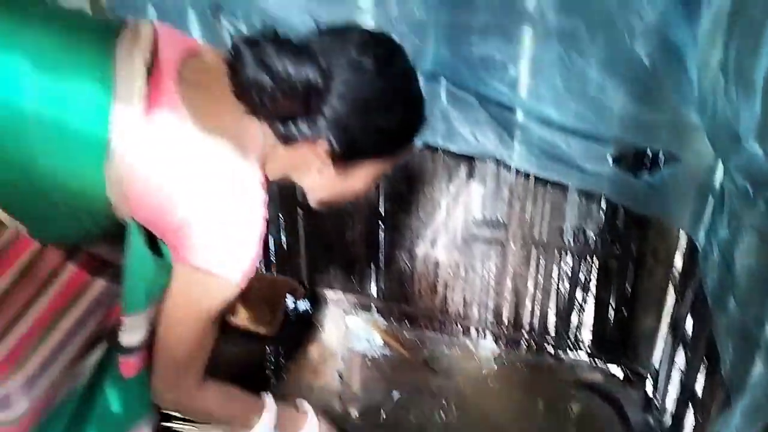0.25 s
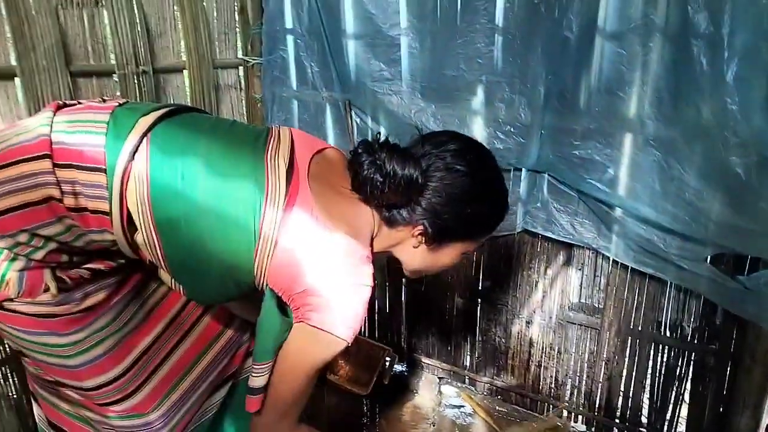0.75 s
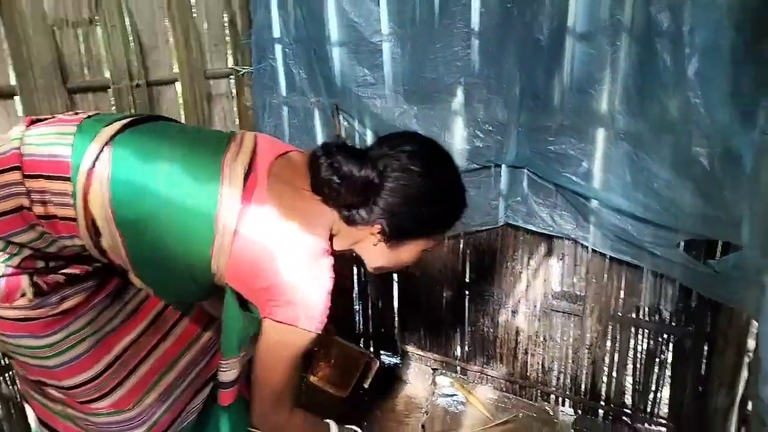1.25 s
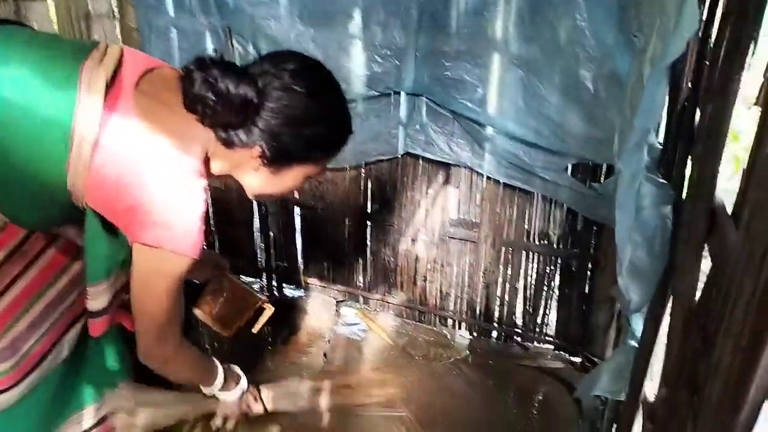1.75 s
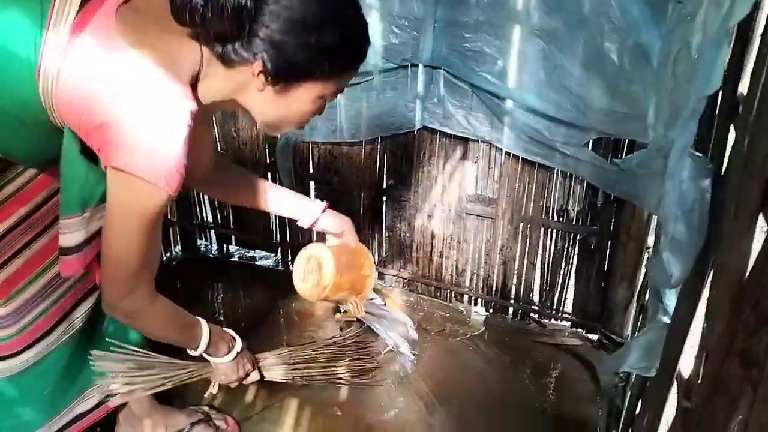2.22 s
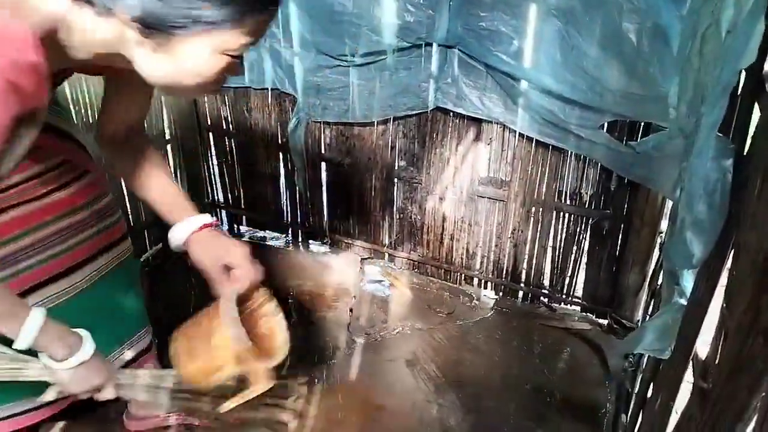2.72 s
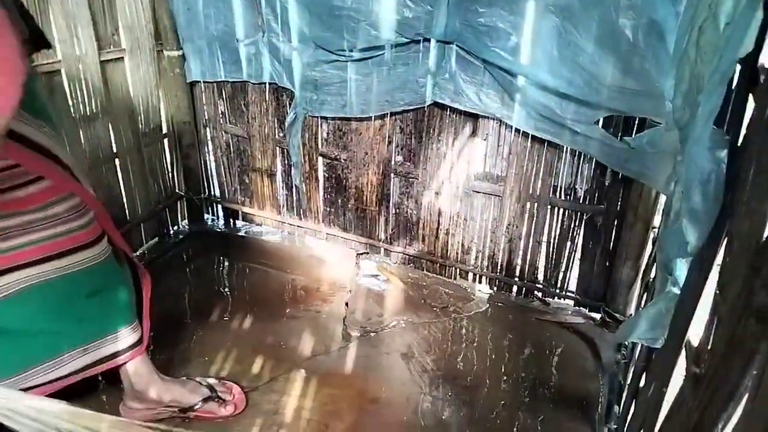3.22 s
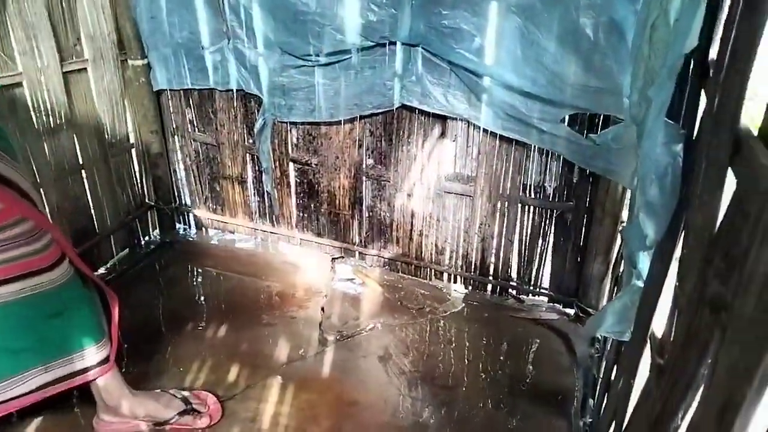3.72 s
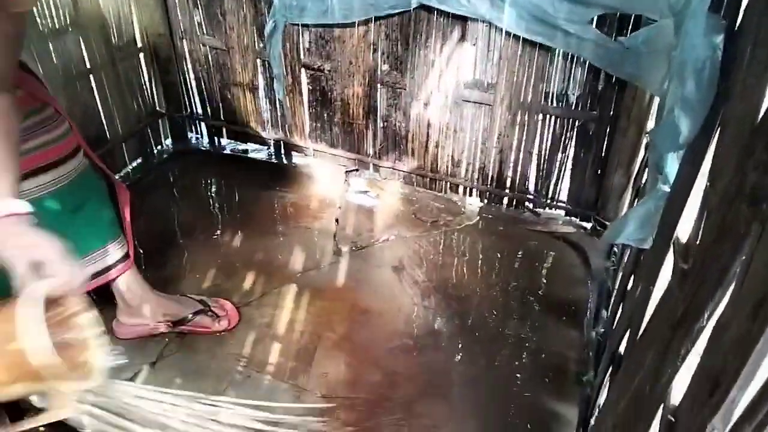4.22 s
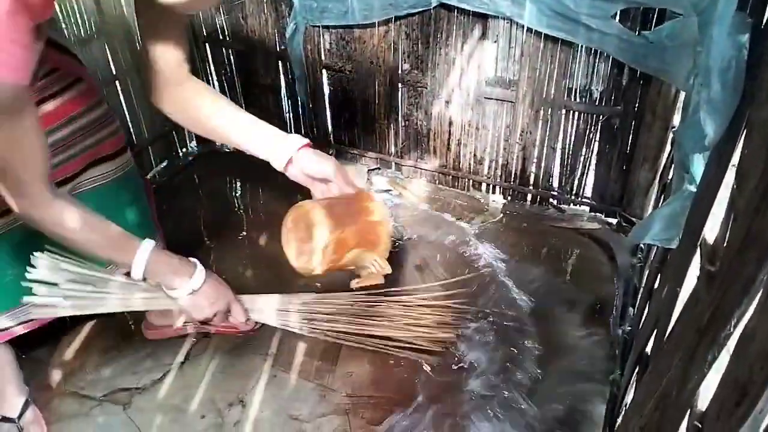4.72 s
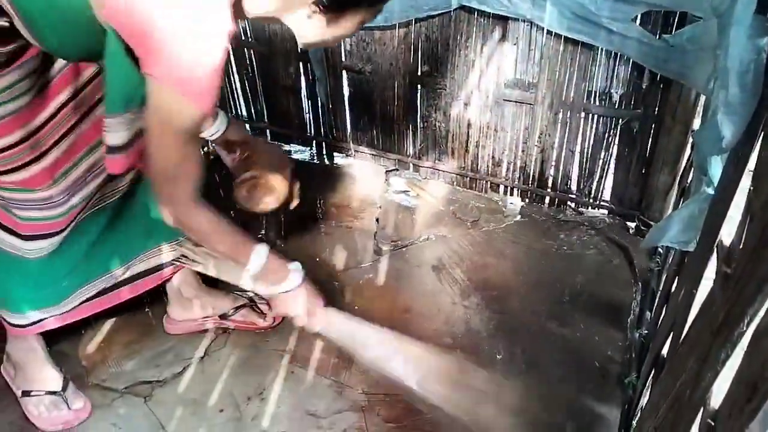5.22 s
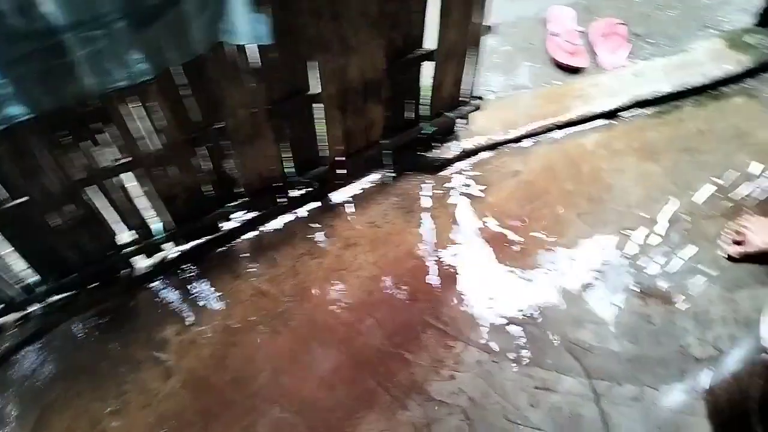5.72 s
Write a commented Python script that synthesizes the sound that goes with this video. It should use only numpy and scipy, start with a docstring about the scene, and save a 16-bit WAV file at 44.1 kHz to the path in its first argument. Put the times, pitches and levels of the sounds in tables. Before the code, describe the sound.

Quick dry-edged swishes of a bundle of sticks on wet floor come first, with snaps and slosh. After two seconds a hollow plastic knock and brief splash lead into a quieter gap with mostly motor hum. Then come a bubbling gulp, drips, clicks, a longer splash and renewed softer scrubbing. Close handheld microphone, short scatter from thin walls, slightly harsh treble.

```python
"""A small bamboo washroom, heard close up: a stiff stick broom scrubs the wet floor in quick strokes.
Its sticks are crowds of short rings under stroke-shaped gains; stirred and thrown water is crowds of
longer bubble rings. A plastic mug gulps air as sliding sines and knocks as a set of ringing modes.
Far off, a slow engine throbs as a sum of harmonics over a soft noise hiss."""
import sys
import numpy as np
from scipy import signal
from scipy.fft import rfft, irfft, next_fast_len
from scipy.io import wavfile

SR = 44100
rng = np.random.default_rng(int(sys.argv[2]) if len(sys.argv) > 2 else 0)


def wrap_up_sound(samples):
    """Save the sound to the file named by the first command line argument, as 16-bit audio."""
    columns = np.atleast_2d(samples).T
    # keep every value between -1 and 1, then stretch to whole-number steps
    tamed = np.clip(columns, -1, 1)
    steps = np.round(tamed * 32767).astype(np.int16)
    wavfile.write(sys.argv[1], SR, steps)


N = 263056
TIME = np.arange(N) / SR

# flicks, where the stick tips land or spring free: start_s, scrape_db (before the broom's trim),
# stirred_db (before the slosh trim)
FLICKS = [(0.074, -26.5, -49), (0.42, -69, -52), (0.47, -27.5, -39), (1.107, -21.5, -33),
          (1.338, -33.5, -37.5), (1.707, -24, -35.5), (1.912, -27.5, -32.5), (5.078, -45, -51),
          (5.27, -36.5, -37.5), (5.785, -39.5, -39)]


def from_db(db):
    """Decibels to gain."""
    return 10 ** (np.asarray(db) / 20)


def rms_one(x):
    """Scale to rms 1."""
    return x / np.sqrt(np.mean(x ** 2) + 1e-20)


def at_hz(points, hz):
    """Read a table on a log-frequency axis."""
    f, value = np.transpose(points)
    return np.interp(np.log(np.maximum(hz, 1)), np.log(f), value)


def at_time(points):
    """Read a table of (time_s, value) at every sample."""
    return np.interp(TIME, *np.transpose(points))


def drift(rate_hz):
    """Random values of spread 1, drawn rate_hz times a second and joined by straight lines."""
    return np.interp(TIME * rate_hz, np.arange(2000), rng.standard_normal(2000))


def decay(t, t60_s):
    """Gain that falls 60 dB in t60_s."""
    return np.exp(-np.log(1000) * t / t60_s)


def ring(x, hz, t60_s):
    """Two-pole resonator: a unit click sets a dying sine of starting height 1 ringing."""
    radius = decay(1 / SR, t60_s)
    w = 2 * np.pi * hz / SR
    # the tiny offset keeps the filter clear of slow, vanishing numbers
    return signal.lfilter([0, np.sin(w)], [1, -2 * radius * np.cos(w), radius ** 2], x + 1e-18)


def diffuse(pair, spectrum):
    """Two unrelated signals become a coloured stereo field, alike in the bass; rms 1."""
    # left-right correlation: pitch_hz, likeness (0 unrelated, 1 identical)
    likeness = [(30, 0.43), (350, 0.69), (700, 0.63), (1300, 0), (2000, 0.024), (15000, 0)]
    size = next_fast_len(N)
    hz = np.arange(size // 2 + 1) * SR / size
    mid, side = rfft(pair, size) * from_db(at_hz(spectrum, hz))
    alike = at_hz(likeness, hz)
    left_right = np.sqrt(1 + alike) * mid + np.sqrt(1 - alike) * side * [[1], [-1]]
    return rms_one(irfft(left_right, size)[:, :N])


def grains(per_s, low_hz, high_hz, cycles, spread_db, clump_db, count):
    """Random clicks ring a row of resonators, each busy in spells; two unrelated mixes, flat per Hz."""
    out = np.zeros((2, N))
    each = int(per_s / count * N / SR)
    for hz in np.geomspace(low_hz, high_hz, count):
        when, turn = rng.random((2, each))
        size = np.clip(rng.standard_normal(each), -2, 2)
        spell = np.interp(when, np.linspace(0, 1, 270), rng.standard_normal(270))
        # each grain reaches the ears by its own paths
        ears = np.array([np.cos(2 * np.pi * turn), np.sin(2 * np.pi * turn)])
        clicks = np.zeros((2, N))
        clicks[:, (when * N).astype(int)] = ears * from_db(spread_db * size + clump_db * spell)
        out += np.sqrt(hz) * rms_one(ring(clicks, hz, cycles / hz))
    return rms_one(out)


def add(out, start_s, sound):
    """Mix a short sound in at start_s."""
    at = max(round(start_s * SR), 0)
    out[..., at:at + sound.shape[-1]] += sound[..., :N - at]


def swell(start_s, hold_s, attack_s, release_s):
    """Gain that rises to 1 at start_s, holds and dies away; attack and release are times for 20 dB."""
    early = np.maximum(start_s - TIME, 0)
    late = np.maximum(TIME - start_s - hold_s, 0)
    return from_db(-np.minimum(20 * (early / attack_s + late / release_s), 200))


def room(x):
    """The direct sound and a short scatter from the slatted walls, different at each ear."""
    t60_s, scatter_db = 0.086, -3.5
    t = TIME[:SR // 3]
    tail = rng.standard_normal((2, len(t))) * decay(t, t60_s) * (t > .003)
    tail /= np.sqrt(np.sum(tail ** 2, axis=1, keepdims=True))
    # thin walls let the bass out
    tail = signal.sosfilt(signal.butter(1, 700, "high", fs=SR, output="sos"), tail)
    scatter = signal.fftconvolve(np.broadcast_to(x, (2, N)), tail, axes=1)[:, :N]
    return x + from_db(scatter_db) * scatter


def hiss():
    """Background hiss: coloured stereo noise at a slowly moving level."""
    # loudness: time_s, level_db
    loudness = [(0, -47.5), (1.5, -46), (4.4, -43.5), (5.75, -45)]
    # spectrum: pitch_hz, relative density_db (per Hz)
    spectrum = [(25, 7), (60, 18), (150, 16.5), (300, 11.5), (410, 5), (600, -2.5), (850, -1), (1200, 6),
                (1600, 1.5), (2200, 4.5), (4000, -4), (7000, -11), (9200, 1.5), (11000, -11.5),
                (14500, -17)]
    return from_db(at_time(loudness)) * diffuse(rng.standard_normal((2, N)), spectrum)


def engine(first_firing_s, knock_delay_s, knock_db, uneven_db):
    """Harmonics of the firing rate, phased as a firing that rings the exhaust, then a brighter knock."""
    # engine speed: time_s, firing_rate_hz
    firing_rate = [(0, 25.0), (1.6, 25.0), (1.8, 24.95), (6, 24.95)]
    # exhaust harmonics: multiple of the firing rate, relative level_db
    exhaust = [(1, -47), (2, -15), (3, -24.5), (4, -17.5), (5, -7.5), (6, 1.5), (7, -6.5), (8, -18.5),
               (9, -11), (10, -18.5), (11, -11), (12, -12), (13, -16), (14, -27), (15, -43.5), (16, -70.5)]
    # loudness: time_s, level_db (before the left-right balance)
    loudness = [(0, -34.5), (.8, -35.5), (2.3, -33.5), (4.4, -32.5), (5.8, -35)]
    speed = at_time(firing_rate)
    turns = np.cumsum(speed) / SR - first_firing_s * speed[0]
    orders, levels_db = np.transpose(exhaust)
    gains = from_db(levels_db)
    knock = from_db(knock_db) * (orders / 10) ** 2
    pair = 1 + knock * np.exp(-2j * np.pi * orders * speed[0] * knock_delay_s)
    pipe = np.log(gains / np.abs(pair))
    # minimum phase: a sudden puff, then a dying ring
    mirrored = np.r_[pipe[0], pipe, pipe[-2::-1]]
    lags = np.imag(signal.hilbert(mirrored))[1:len(orders) + 1] - np.angle(pair)
    throb = sum(g * np.cos(2 * np.pi * k * turns - lag) for k, g, lag in zip(orders, gains, lags))
    throb = rms_one(throb * from_db(uneven_db * drift(25))) * from_db(at_time(loudness))
    late = np.interp(TIME - .00033, TIME, throb)   # it comes from the left
    return np.array([throb * from_db(0.6), late * from_db(-0.4)])


def mug():
    """A soft contact rings the modes of the plastic mug, a little differently each time."""
    # dull knocks: start_s, level_db (gain on the modes), contact_hz (low-pass cut-off)
    knocks = [(1.018, -39, 900), (2.387, -19.5, 808), (4.25, -34, 1100), (4.31, -35, 1100),
              (5.725, -43, 700)]
    # mug modes: pitch_hz, mean level_db, t60_s
    mug_modes = [(410, -4.5, 0.024), (563, 3, 0.0083), (644, -1, 0.025), (880, -4.5, 0.024),
                 (1100, -7, 0.037), (1380, -20, .02)]
    out, t = np.zeros(N), TIME[:SR // 4]
    for start_s, level_db, contact_hz in knocks:
        modes = np.zeros(len(t))
        for k, (hz, db, t60_s) in enumerate(mug_modes):
            gain = from_db(db + rng.standard_normal()) * (-1) ** k
            modes += gain * ring(t == 0, hz, t60_s)
        soft = signal.butter(2, contact_hz, fs=SR, output="sos")
        add(out, start_s, from_db(level_db) * signal.sosfilt(soft, modes))
    return out


def bubbles(rows, glide, attack_s, ragged):
    """Each pocket of air rings as a dying sine whose pitch slides; moving water makes its level ragged."""
    out, t = np.zeros(N), TIME[:SR // 4]
    for start_s, level_db, hz, t60_s in rows:
        slide = 1 + glide * np.minimum(t / t60_s, 1)
        phase = 2 * np.pi * np.cumsum(hz * slide) / SR
        shake = rms_one(ring(rng.standard_normal(len(t)), hz, 24 / hz))
        tone = (np.sin(phase) + ragged * shake) / np.sqrt(1 + 2 * ragged ** 2)
        add(out, start_s, from_db(level_db) * tone * decay(t, t60_s) * (1 - np.exp(-t / attack_s)))
    return out


def gulps():
    """The mug gulps air as it goes under: bubbles that slide down in pitch."""
    # start_s, level_db (before onset and decay), first pitch_hz, t60_s
    rows = [(3.606, -6.5, 544, 0.033), (3.618, -8.5, 528, 0.05), (3.64, -29, 492, 0.11)]
    return bubbles(rows, glide=-.05, attack_s=0.0026, ragged=0.29)


def plops():
    """Single large bubbles and drops that slide up in pitch."""
    # start_s, level_db (before onset and decay), first pitch_hz, t60_s
    rows = [(0.967, -10, 1540, 0.01), (2.499, -19.5, 2030, 0.023), (2.675, -34, 760, 0.1),
            (3.502, -22.5, 410, 0.074), (3.524, -29, 2310, 0.045), (3.528, -30, 884, 0.063),
            (3.83, -31, 2260, 0.026), (3.99, -21.5, 2300, 0.031), (4.0, -34.5, 880, 0.14),
            (4.01, -24, 1062, 0.052), (4.543, -29, 3260, 0.032), (4.884, -19.5, 2377, 0.07),
            (5.245, -33, 489, 0.096), (5.755, -36, 653, 0.11), (5.76, -27, 1030, 0.055),
            (5.862, -30.5, 1928, 0.11)]
    return bubbles(rows, glide=0.12, attack_s=0.00078, ragged=0.44)


def gurgles(scatter, cycles, count):
    """A crowd of bubbles whose common pitch glides as broom or mug pushes the film of water along."""
    # start_s, length_s, level_db (rms over the length), first_hz, last_hz
    rows = [(0.015, 0.033, -35, 1790, 1750), (0.0, 0.11, -31, 2780, 3690),
            (0.105, 0.095, -37.5, 3660, 2660), (1.014, 0.082, -40, 1900, 2040),
            (1.031, 0.074, -45, 2770, 2830), (3.561, 0.05, -42, 1900, 1590), (3.985, 0.11, -45, 2520, 2010),
            (4.669, 0.053, -39.5, 1420, 1154), (4.736, .08, -35, 3360, 2820),
            (4.775, 0.075, -35.5, 1840, 1254), (5.41, .15, -33.5, 3640, 3180),
            (5.682, .11, -38, 1830, 1117), (5.774, .06, -37.5, 1470, 1710)]
    out = np.zeros((2, N))
    for start_s, length_s, level_db, first_hz, last_hz in rows:
        share = (np.arange(count) + rng.random(count)) / count
        chance = rng.standard_normal((3, count))
        hz = (first_hz * (last_hz / first_hz) ** share * np.exp(scatter * chance[0]))[:, None]
        age = np.maximum(TIME[:SR // 3] - length_s * share[:, None], 0)
        rings = np.sin(2 * np.pi * hz * age) * decay(age, cycles / hz)
        # swells and fades, differently at each ear
        crowd = (np.tanh(chance[1:]) * np.sqrt(np.sin(np.pi * share))) @ rings
        power = np.sum(crowd ** 2) / (2 * length_s * SR)
        add(out, start_s, from_db(level_db) * crowd / np.sqrt(power))
    return out


def pouring():
    """Gains of (spray, bubbling): the longer the water runs, the longer it takes to settle."""
    # water poured, scooped or flung: start_s, hold_s, spray_db, bubbling_db (before their trims)
    pours = [(2.478, 0.012, -37.5, -55), (2.502, 0.005, -52, -37.5), (2.699, 0.0081, -39, -43),
             (3.517, 0.028, -43, -40), (3.606, 0.0028, -39.5, -33), (3.894, 0.16, -50.5, -46.5),
             (4.511, 0.25, -47, -46.5), (4.627, 0.3, -36, -39), (4.664, 0.16, -53, -30.5),
             (5.018, 0.0075, -50, -35.5), (5.679, 0.05, -40, -27.5)]
    attack_s, settle_s, settle_share = 0.017, 0.057, 0.69   # the share is of the hold time
    power = np.zeros((2, N))
    for start_s, hold_s, *levels_db in pours:
        flow = swell(start_s, hold_s, attack_s, settle_s + settle_share * hold_s)
        power += np.outer(from_db(levels_db), flow) ** 2
    return np.sqrt(power)


def water(stirring):
    """The broom and the falling water both whip up small bubbles; thrown water also sprays."""
    # spectra of bubbles and of spray: pitch_hz, relative density_db (per Hz)
    bubble_spectrum = [(300, -14), (600, -25), (1000, -11), (1400, -4.5), (2200, 3.5), (3000, -0.5),
                       (4200, -1), (7000, -6)]
    spray_spectrum = [(300, -37), (700, -6.5), (2000, -22), (3300, 3.5), (5000, 0.5), (7000, 2.5),
                      (10000, -1), (14500, -2.5)]
    stirred = grains(per_s=6000, low_hz=501, high_hz=5500, cycles=42,
                     spread_db=1.0, clump_db=-2.0, count=24)
    poured = grains(per_s=4500, low_hz=504, high_hz=5500, cycles=73,
                    spread_db=0.5, clump_db=2.0, count=28)
    droplets = grains(per_s=17000, low_hz=700, high_hz=14700, cycles=4.2,
                      spread_db=0.5, clump_db=-4.4, count=14)
    spraying, bubbling = pouring()
    slosh = from_db(1.24) * stirring * diffuse(stirred, bubble_spectrum)
    splash = from_db(-0.34) * bubbling * diffuse(poured, bubble_spectrum)
    spray = from_db(2.5) * spraying * diffuse(droplets, spray_spectrum)
    return slosh + splash + spray


def snaps():
    """Every flick opens with a snap of the sticks that follows its scrape level; rows like the slaps."""
    lead_s, above_scrape_db, t60_s, brightest_hz = .011, 6, .065, 7840
    return [(start_s - lead_s, scrape_db + above_scrape_db, t60_s, brightest_hz)
            for start_s, scrape_db, _ in FLICKS]


def slaps(focus_db, focus_cycles):
    """A sharp contact scatters a quickly dying burst, brightest around one pitch."""
    # slaps of water and loose clicks of the sticks:
    # start_s, level_db (99th percentile of the burst before decay), t60_s, brightest_hz
    contacts = [(0.9477, -17.5, 0.026, 9700), (0.951, -19, 0.052, 3680), (1.018, -28, .06, 1960),
                (1.675, -30, 0.068, 3500), (2.468, -23.5, 0.06, 5500), (2.5, -21, 0.059, 2700),
                (2.675, -26, 0.05, 2610), (3.496, -22, 0.051, 1390), (3.526, -33, 0.058, 5000),
                (3.6052, -20, 0.052, 2700), (3.9048, -28, 0.029, 8100), (4.0737, -23.5, 0.032, 7100),
                (4.252, -29.5, 0.032, 2750), (4.31, -31, 0.017, 1530), (4.369, -16.5, 0.025, 4800),
                (4.6204, -27, 0.14, 5000), (4.884, -25, .04, 2400), (5.3316, -19, 0.038, 7000)]
    out, t = np.zeros((2, N)), TIME[:SR // 4]
    lean = signal.butter(1, 1500, "high", fs=SR, output="sos")
    for start_s, level_db, t60_s, hz in list(contacts) + snaps():
        burst = signal.sosfilt(lean, rng.standard_normal((2, len(t))))
        focus = rms_one(ring(burst, hz, focus_cycles / hz))
        burst = rms_one(burst) + from_db(focus_db) * focus
        burst /= np.percentile(np.abs(burst), 99)
        add(out, start_s, from_db(level_db) * burst * decay(t, t60_s))
    return out


def sweeping():
    """Gains of (scrape, stirred water): strokes press, ease and trail away; flicks scratch on top."""
    # broom strokes: start_s (full pressure), hold_s, attack_s, release_s (for 20 dB),
    # scrape_db, stirred_db (before the broom and slosh trims)
    strokes = [ (0.0, 0.092, 0.1, 0.14, -26, -36.5), (0.58, 0.035, 0.1, 0.16, -21, -38),
               (1.17, 0.05, 0.073, 0.19, -23.5, -38.5), (1.783, 0.066, 0.078, 0.14, -25.5, -42.5),
               (2.94, 0.17, 1, 0.26, -46.5, -53.5), (3.077, 0.043, 0.094, 0.046, -56, -40.5),
               (5.158, 0.023, 0.064, 0.029, -36, -36.5), (5.377, 0.04, 0.25, 0.13, -29, -42.5),
               (5.463, 0.2, 0.15, 0.27, -28.7, -31), ]
    # after a stroke the wet sticks trail over the floor: level against the stroke, time to fall 20 dB
    trail_db, trail_s = -14.5, 0.35
    flick_attack_s, flick_hold_s, flick_release_s = 0.024, 0.008, 0.064
    power = np.zeros((2, N))
    for start_s, hold_s, attack_s, release_s, *levels_db in strokes:
        press = swell(start_s, hold_s, attack_s, release_s)
        trail = from_db(trail_db) * swell(start_s, hold_s, attack_s, trail_s)
        power += np.outer(from_db(levels_db), np.maximum(press, trail)) ** 2
    for start_s, *levels_db in FLICKS:
        flick = swell(start_s, flick_hold_s, flick_attack_s, flick_release_s)
        power += np.outer(from_db(levels_db), flick) ** 2
    return np.sqrt(power)


def broom(scraping):
    """Stick tips catch and slip on the floor, each slip ringing for a few cycles."""
    # scrape spectrum: pitch_hz, relative density_db (per Hz)
    scrape_spectrum = [(300, -40), (600, -17.5), (1200, -14.5), (2000, -11), (3300, 0.5), (5000, 0.5),
                       (7000, -1), (10000, -1), (12000, 0), (14500, -2)]
    slips = grains(per_s=26000, low_hz=600, high_hz=14000, cycles=8,
                   spread_db=1, clump_db=1.3, count=26)
    return from_db(2) * scraping * diffuse(slips, scrape_spectrum)


def scene():
    """Far engine and hiss, then water, mug and broom in the washroom; the whole level drops at the end."""
    drop_at_s, drop_s, drop_db = 5.8, .1, -9
    lift_db = -10   # the broom also lifts off the floor
    ending = np.clip((TIME - drop_at_s) / drop_s, 0, 1)
    far = hiss() + engine(first_firing_s=.0375, knock_delay_s=.0223, knock_db=-4.0, uneven_db=0.6)
    close = mug() + gulps() + plops() + gurgles(scatter=0.1116, cycles=57, count=44)
    close = close + slaps(focus_db=5.0, focus_cycles=11.7)
    scraping, stirring = sweeping() * from_db(lift_db * ending)
    return from_db(drop_db * ending) * (far + room(close) + water(stirring) + broom(scraping))


def port(x, resonances):
    """A microphone port as a chain of peaks and notches."""
    for hz, width_hz, db in resonances:
        w, g = 2 * np.pi * hz / SR, from_db(db / 2)
        a = np.tan(np.pi * width_hz / SR)
        top = [1 + a * g, -2 * np.cos(w), 1 - a * g]
        bottom = [1 + a / g, -2 * np.cos(w), 1 - a / g]
        x = signal.lfilter(top, bottom, x)
    return x


def record(dry):
    """Each microphone port colours its own channel; a steep low-pass cuts the top."""
    # port resonances: pitch_hz, width_hz, level_db
    left_port = [(4970, 1800, -2), (6940, 1000, -9), (8910, 2180, 8.5), (11090, 1620, 5.5)]
    right_port = [(6780, 1540, 9.5), (9170, 1230, -22.5), (10160, 750, 4)]
    heard = np.array([port(dry[0], left_port), port(dry[1], right_port)])
    cutoff_hz = 14250
    return signal.sosfilt(signal.ellip(12, .1, 80, cutoff_hz, fs=SR, output="sos"), heard)


dry = scene()
out = record(dry)
wrap_up_sound(out)
```